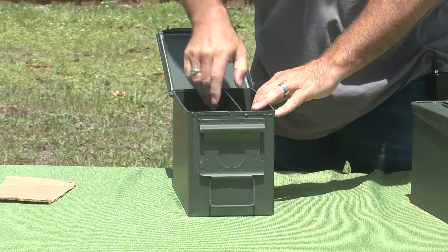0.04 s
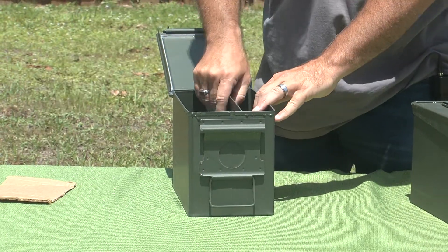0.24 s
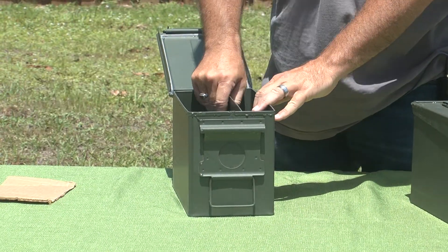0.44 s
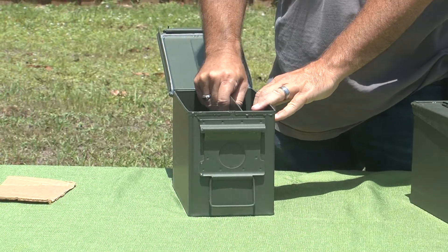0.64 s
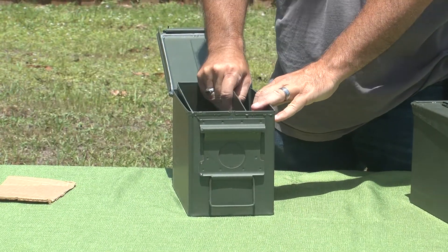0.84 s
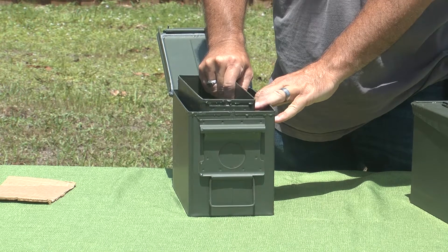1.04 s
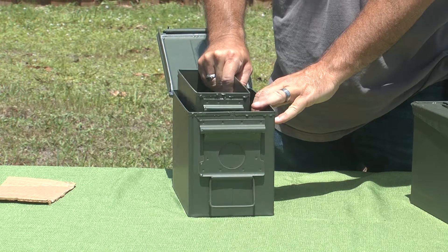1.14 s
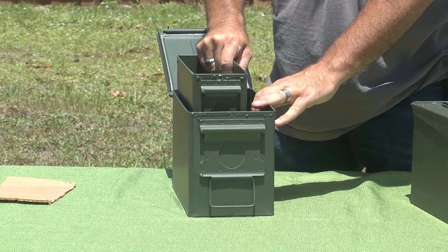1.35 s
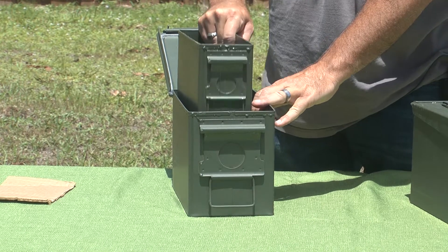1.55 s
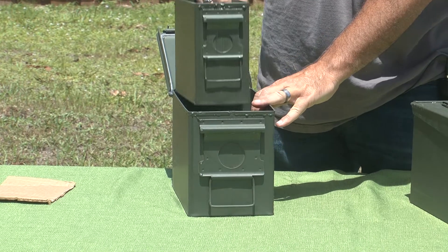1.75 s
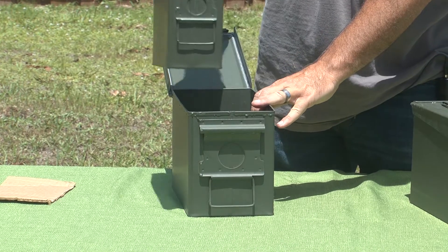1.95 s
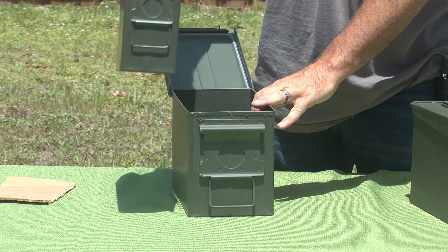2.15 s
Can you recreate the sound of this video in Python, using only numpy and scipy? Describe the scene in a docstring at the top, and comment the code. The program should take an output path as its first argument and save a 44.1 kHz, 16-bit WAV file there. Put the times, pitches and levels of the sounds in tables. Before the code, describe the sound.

Metal boxes knock, scrape and crack against each other outdoors, over wind rumble.

```python
"""An outdoor table, close pair of microphones: a small steel ammunition can is lifted out of a larger one.
Over wind rumble and a high hiss like grass insects, a sleeve rustles as the arm reaches in.
From 0.25 s the cans tap and scrape: panels boom, the sheet clangs, the edges tick and ring.
Just after 1.1 s one wall judders, then catches on the rim with hard cracks, the loudest moment.
Dull thumps, lighter scrapes and a few faint taps follow."""
import sys
import numpy as np
from scipy import signal
from scipy.fft import rfft, irfft
from scipy.io import wavfile
from scipy.ndimage import uniform_filter1d

SR = 44100
rng = np.random.default_rng(int(sys.argv[2]) if len(sys.argv) > 2 else 0)


def store_pcm(level_fs):
    """Save levels as 16-bit WAV."""
    pcm = np.round(np.clip(level_fs, -1, 1) * 32767).astype(np.int16)
    wavfile.write(sys.argv[1], SR, np.atleast_2d(pcm).T)


N = 97020
TIME = np.arange(N) / SR
STRIKE_S = 0.0052  # the opening stretch of a blow, which sets its level
# spectrum of the open air (frequency [Hz], relative level [dB])
AIR_SPECTRUM = [(200, 17.5), (400, 15), (600, 1.5), (1000, -2.5), (2000, -12), (4000, -11.5), (8000, -9.5),
                (13000, -8), (16000, -6.5)]


def from_db(db):
    """Decibels to gain."""
    return 10 ** (np.asarray(db) / 20)


def unit_power(x):
    """Scale to unit power."""
    return x / np.sqrt(np.mean(x ** 2) + 1e-20)


def in_time(rows):
    """Each column of a curve at every sample."""
    times, *columns = np.transpose(rows)
    return [np.interp(TIME, times, column) for column in columns]


def at_hz(spectrum, hz):
    """Read a spectrum on a log-frequency axis."""
    points_hz, db = np.transpose(spectrum)
    return np.interp(np.log(hz + 1e-9), np.log(points_hz), db)


def colour(x, spectrum):
    """Shape a sound by a smooth spectrum."""
    hz = np.arange(N // 2 + 1) * SR / N
    return irfft(rfft(x) * from_db(at_hz(spectrum, hz)), N)


def noise(spectrum):
    """Coloured noise of unit power."""
    return unit_power(colour(rng.standard_normal(N), spectrum))


def ringing(modes):
    """Decaying sines after one blow, starting at unit power."""
    t = TIME[:SR // 3]
    ring = sum((-1) ** k * from_db(db - 60 * t / t60) * np.sin(2 * np.pi * hz * t)
               for k, (hz, db, t60) in enumerate(modes))
    return ring / np.sqrt(np.sum(from_db(np.array(modes)[:, 1]) ** 2) / 2)


def crowded_modes(spectrum, t60_s, count):
    """Many close modes scattered over a spectrum, each with its own strength, phase and decay."""
    t = TIME[:SR // 3]
    place, size, life, phases = rng.random((4, count))
    low_hz, high_hz = spectrum[0][0], spectrum[-1][0]
    modes_hz = low_hz + (high_hz - low_hz) * (np.arange(count) + place) / count
    gains = from_db(at_hz(spectrum, modes_hz)) * (.5 + size)
    decays_s = t60_s * 2 ** (life - .5)
    ring = sum(gain * from_db(-60 * t / t60) * np.sin(2 * np.pi * (hz * t + phase))
               for hz, gain, t60, phase in zip(modes_hz, gains, decays_s, phases))
    return ring / np.sqrt(np.mean(ring[:int(STRIKE_S * SR)] ** 2))


def outdoors(wind_db=-26, air_db=-48.5):
    """Wind rumble, steady air and a high insect-like hiss, ducked by the recorder's gain after knocks."""
    # wind and hiss spectra (frequency [Hz], relative level [dB])
    wind_spectrum = [(15, 4.5), (32, 4.5), (55, -5.5), (100, -12), (150, -18.5), (230, -33.5), (400, -33),
                     (600, -42), (1000, -52), (2000, -72)]
    hiss_spectrum = [(2000, -33), (6000, -17), (9500, -4.5), (11500, 5.5), (12500, 8.5), (14000, 0),
                     (16000, 9)]
    # swell of the rumble on top of wind_db (time [s], level [dB])
    wind_swell = [(0, -5.5), (.21, 1), (.26, 6), (.33, 5.5), (.6, -1), (.78, -0.5), (.88, 5), (.99, 2.5),
                  (1.07, 3.5), (1.18, 11.5), (1.28, 5), (1.38, -1), (1.6, -1.5), (1.76, 2), (1.85, -4),
                  (2.0, -1.5), (2.2, -7.5)]
    # hiss, with the recorder's gain dips after loud knocks drawn in (time [s], level [dB])
    hiss_level = [(0, -48.5), (.2, -61), (.41, -64), (.49, -44), (.56, -47.5), (.64, -51), (.72, -44.5),
                  (.80, -45.5), (.93, -54.5), (1.0, -44.5), (1.06, -46.5), (1.13, -51), (1.28, -71),
                  (1.58, -71), (1.63, -50), (1.70, -71), (1.98, -55), (2.2, -63)]
    rumble = from_db(wind_db + in_time(wind_swell)[0]) * noise(wind_spectrum)
    hiss = from_db(in_time(hiss_level)[0]) * noise(hiss_spectrum)
    return rumble + hiss + from_db(air_db) * noise(AIR_SPECTRUM)


def shirt_rustle():
    """The arm brushes the shirt while reaching in."""
    # the brush (time [s], level [dB])
    brush = [(0, -54), (.12, -56.5), (.21, -56), (.3, -84)]
    # cloth spectrum (frequency [Hz], relative level [dB])
    cloth = [(500, -22), (1200, -9.5), (1900, 2), (2600, -4.5), (3500, 0), (5000, -7), (8500, -4),
             (12000, -3)]
    return from_db(in_time(brush)[0]) * noise(cloth)


def thumps(lowpass_hz=400):
    """Soft, heavy bumps behind the cans that ring only in the bass."""
    # bumps (time [s], level [dB])
    bumps = [(0.833, -13), (1.644, -7), (1.660, -12), (1.748, -26.5), (1.894, -17.5)]
    # their resonances (frequency [Hz], relative level [dB], t60 [s])
    bass_modes = [(51.2, 3, 0.16), (91, 3.5, 0.14), (114.7, -1.5, 0.19), (173.3, -3, 0.2),
                  (243.5, -11.5, 0.132), (287.2, -8, 0.137)]
    force = np.zeros(N)
    for at_s, db in bumps:
        force[int(at_s * SR)] += from_db(db)
    boom = signal.fftconvolve(force, ringing(bass_modes))[:N]
    return signal.sosfilt(signal.butter(2, lowpass_hz, fs=SR, output="sos"), boom)


def rim_clicks():
    """The rim, damped by the fingers, clicks dryly: a brief hollow knock under a bright tick."""
    # clicks (time [s], knock level [dB], tick level [dB])
    clicks = [(.4868, -39.5, -36), (0.6661, -38.5, -40.5), (0.938, -34.5, -31), (1.0862, -40.5, -38),
              (2.0002, -60, -55)]
    # damped rim (frequency [Hz], relative level [dB], t60 [s])
    knock_modes = [(430, 7.5, 0.033), (1010, 3, 0.046), (1146, 2, .04), (3290, -3.5, 0.027),
                   (4170, -7, 0.022), (7280, -3, .02)]
    # tick spectrum (frequency [Hz], relative level per mode [dB])
    tick_spectrum = [(5000, -21.5), (8500, -8.5), (10800, 0), (13000, -2), (16500, -6)]
    out = np.zeros(N + SR)
    for at_s, knock_db, tick_db in clicks:
        knock = from_db(knock_db) * ringing(knock_modes)
        tick = from_db(tick_db) * crowded_modes(tick_spectrum, t60_s=0.024, count=70)
        start = int(at_s * SR)
        out[start:start + len(knock)] += knock + tick
    return out[:N]


def wall_judder(jitter=0.022):
    """The wall sticks and slips faster as the can speeds up: a rising groan with a squeak above it."""
    # stick-slip (time [s], groan pitch [Hz], groan level [dB], squeak pitch [Hz], squeak level [dB])
    slips = [(1.129, 385, -35, 780, -44), (1.134, 400, -16, 870, -38), (1.142, 425, -12, 980, -31),
             (1.152, 455, -17, 1030, -29), (1.163, 505, -22, 1110, -32), (1.180, 540, -30, 1110, -34)]
    # groan harmonics from the fundamental up (relative level [dB])
    harmonics = [2, -29, -26, -47, -32.5]
    groan_hz, groan_db, squeak_hz, squeak_db = in_time(slips)
    speed = 1 + jitter * unit_power(uniform_filter1d(rng.standard_normal(N), size=60))
    groan_phase, squeak_phase = 2 * np.pi * np.cumsum([groan_hz * speed, squeak_hz * speed], axis=1) / SR
    groan = unit_power(sum(from_db(db) * np.sin(k * groan_phase) for k, db in enumerate(harmonics, 1)))
    squeak = unit_power(np.sin(squeak_phase))
    sliding = uniform_filter1d(1. * (TIME > slips[0][0]) * (TIME < slips[-1][0]), size=150)
    return sliding * (from_db(groan_db) * groan + from_db(squeak_db) * squeak)


def rim_cracks():
    """Single sharp pressure pulses as the wall catches and jumps over the rim."""
    # pulses (time [s], peak level [dB], width [s])
    pulses = [(1.1917, -4.5, 0.00023), (1.1924, -3, 0.000033), (1.1947, -3.5, 0.000051),
              (1.1975, -4.5, 0.00018), (1.1983, -6.5, 0.00095), (1.2050, -5, 0.00066),
              (1.2078, -8, 0.00033)]
    return sum(from_db(db) * np.exp(-(2 * (TIME - at_s) / width_s) ** 2) for at_s, db, width_s in pulses)


def paint_grains(grains_per_s=6000, spread_db=3):
    """Tiny collisions of rough paint, uneven in size and spacing."""
    hits = rng.random(N) < grains_per_s / SR
    signs = rng.choice([-1, 1], N)
    sizes = from_db(spread_db * np.minimum(rng.exponential(1, N), 4))
    return unit_power(hits * signs * sizes)


def tap_forces(chatter=0.86):
    """Can knocks on can: a clean push on panels and rim, a chattering contact on sheet and edges."""
    # taps (time [s], panel [dB], sheet [dB], edge [dB], rim [dB], contact decay [s])
    taps = [(0.25, -13, -27, -46, -43, 0.0012), (0.2604, -17, -65, -31, -28, 0.00067),
            (0.2654, -17.5, -59, -28, -17, 0.0037), (0.281, -23.5, -64, -34, -45, .002),
            (0.342, -49, -53, -51, -60, 0.0034), (0.3778, -26.5, -36.5, -31, -27, 0.0028),
            (0.472, -31, -48.5, -65, -70, 0.011), (0.708, -32, -62, -65, -70, .003),
            (0.7373, -41, -45, -41, -61, 0.0024), (0.9536, -29, -46, -42.5, -56, 0.0013),
            (1.042, -32, -45, -44, -62, 0.008), (1.174, -14.5, -45, -24, -22, 0.0021),
            (1.2355, -45, -47.5, -27.5, -32, 0.0047), (1.243, -25, -39, -36, -52, 0.0075),
            (1.4445, -30.5, -40, -35, -38, 0.0049), (1.563, -49, -57.5, -62, -70, 0.0018),
            (1.836, -38.5, -57.5, -61, -73, 0.00084), (2.111, -40, -57, -61, -70, 0.0049),
            (2.135, -49, -53, -67, -70, 0.0029), (2.1747, -40, -53.5, -55, -66, 0.0012)]
    forces, grains = np.zeros((4, N)), paint_grains()
    for at_s, *levels_db, contact_s in taps:
        start = int(at_s * SR)
        push = signal.unit_impulse(N - start)
        buzz = grains[start:] * np.exp(-TIME[:N - start] / contact_s)
        contact = (1 - chatter) * push + chatter * buzz / (np.linalg.norm(buzz) + 1e-9)
        contact /= np.linalg.norm(contact)
        forces[:, start:] += from_db(levels_db)[:, None] * np.array([push, contact, contact, push])
    return forces


def scrape_forces(panel_trim_db=-4):
    """Can slides on can: paint grains under a pressure that swells and fades."""
    # scrapes (peak time [s], 20 dB swell [s], 20 dB fade [s], relative panel, sheet, edge, rim [dB])
    scrapes = [(0.247, .008, 0.018, -13, -31.5, -26, -28), (0.267, 0.016, 0.034, -24.5, -45, -44, -29.5),
               (0.304, 0.024, 0.042, -33, -48, -48, -66), (0.748, 0.02, 0.037, -30.5, -51, -68, -66),
               (0.895, 0.041, 0.03, -31, -49, -53, -68), (0.962, 0.02, 0.015, -38, -48, -53, -62),
               (1.09, 0.065, 0.02, -23.5, -56, -58, -68), (1.146, 0.015, 0.0048, -33, -34.5, -38, -43),
               (1.176, 0.025, 0.002, -11.5, -24.5, -16.5, -38), (1.192, 0.024, 0.0065, -11, -28, -22, -45),
               (1.206, 0.011, 0.051, -15.5, -40.5, -34, -58), (1.661, 0.056, 0.066, -37, -56.5, -61, -74),
               (1.754, 0.0069, 0.02, -34, -51, -66, -74), (1.919, 0.061, 0.057, -38.5, -62.5, -62, -76)]
    pressure = np.zeros((4, N))
    for peak_s, swell_s, fade_s, *levels_db in scrapes:
        from_peak = np.maximum((peak_s - TIME) / swell_s, (TIME - peak_s) / fade_s)
        pressure += from_db(levels_db)[:, None] * from_db(-20 * np.minimum(from_peak, 10))
    pressure[0] *= from_db(panel_trim_db)
    return pressure * paint_grains() / np.sqrt(STRIKE_S * SR)


def steel_cans(sheet_modes_db=-5, sheet_crowd_db=-1):
    """Taps and scrapes set the steel going: panels boom, the sheet clangs, edges tick, the rim rings."""
    # strong modes of panels, sheet, and thin rim with handle (frequency [Hz], relative level [dB], t60 [s])
    panel_modes = [(168.8, -12.5, 0.38), (222.9, 3.5, 0.16), (295.8, 1.5, 0.11), (309.1, 0, .22),
                   (337.7, 4.5, 0.14), (278, 0, 0.089), (372, -9, 0.19), (419.5, 2, .19), (434.4, -3, 0.11),
                   (501.6, 0, 0.099), (602, -22.5, 0.13), (664.4, -23, 0.13), (744, -22.5, 0.23),
                   (910, -42, 0.34)]
    sheet_modes = [(1038, 0, .09), (1168, -5, .12), (1350, -4, .08), (1760, -7, .08), (1922, -3, .1),
                   (2105, -3, .1), (2395, -7, .1), (2890, -12, .1), (3418, -10, .07)]
    rim_modes = [(4940, -15.5, 0.26), (5572, -6, 0.15), (6540, -8.5, 0.086), (8000, -37, .12),
                 (9100, -18, .11), (9800, 1.5, 0.052), (10200, 0, 0.089), (10300, -9, .09),
                 (12890, -8, 0.072), (13100, -16, 0.083), (13600, 17.5, 0.053), (14200, 13.5, 0.051),
                 (14732, 1, 0.049), (15237, 0, 0.026)]
    # crowded modes of the sheet and its edges (frequency [Hz], relative level per mode [dB])
    sheet_spectrum = [(600, 11.5), (1050, 8.5), (1500, 3), (2100, 2.5), (3000, -5.5), (4200, -10.5),
                      (6000, -5.5)]
    edge_spectrum = [(3000, -9), (5500, -9.5), (7500, -5.5), (10000, -1), (12500, -2.5), (15000, 2),
                     (16500, 1)]
    clang = from_db(sheet_modes_db) * ringing(sheet_modes)
    clang += from_db(sheet_crowd_db) * crowded_modes(sheet_spectrum, t60_s=0.082, count=190)
    tick = crowded_modes(edge_spectrum, t60_s=0.029, count=260)
    responses = ringing(panel_modes), clang, tick, ringing(rim_modes)
    forces = tap_forces() + scrape_forces()
    return sum(signal.fftconvolve(force, response)[:N] for force, response in zip(forces, responses))


def scene(diffuse_db=-68):
    """Everything reaches a close pair of microphones, leaning left; each also hears its own faint air."""
    # lean of the image (frequency [Hz], left minus right [dB])
    lean = [(100, 3), (1200, 2.9), (2800, .7), (5500, 0), (9000, .7), (14000, 2.4)]
    sound = steel_cans() + rim_clicks() + wall_judder() + rim_cracks()
    sound += thumps() + outdoors() + shirt_rustle()
    pair = [colour(sound, [(hz, side * db / 2) for hz, db in lean]) for side in (1, -1)]
    return np.array([channel + from_db(diffuse_db) * noise(AIR_SPECTRUM) for channel in pair])


def record(dry, cutoff_hz=15850):
    """Peaks clip at full scale, then a steep low-pass cuts the top treble."""
    lowpass = signal.ellip(10, .2, 80, cutoff_hz, fs=SR, output="sos")
    return signal.sosfilt(lowpass, np.clip(dry, -1, 1))


dry = scene()
out = record(dry)
store_pcm(out)
```